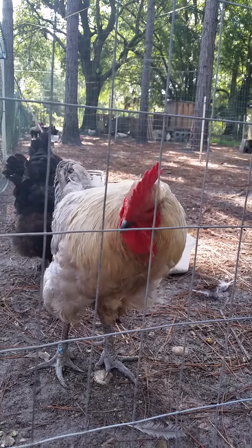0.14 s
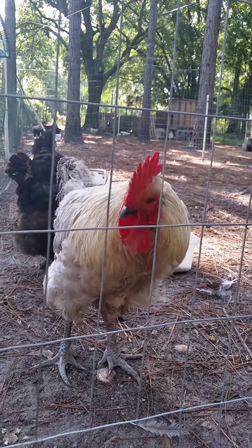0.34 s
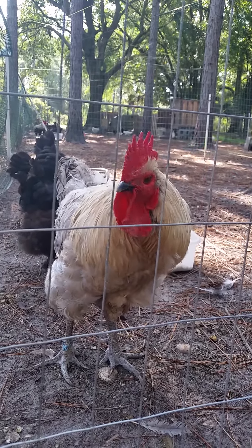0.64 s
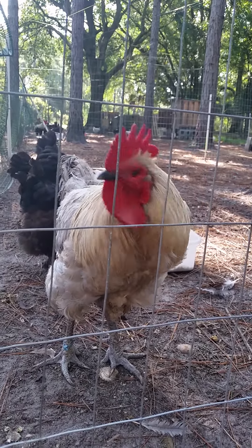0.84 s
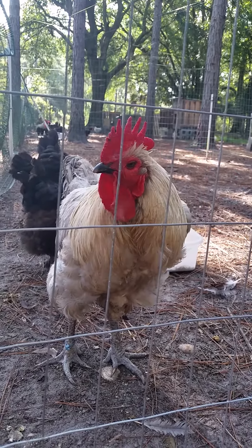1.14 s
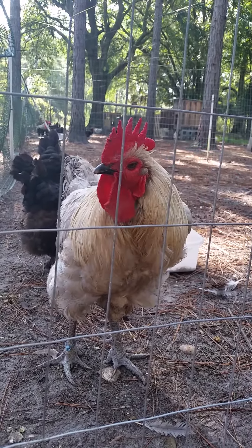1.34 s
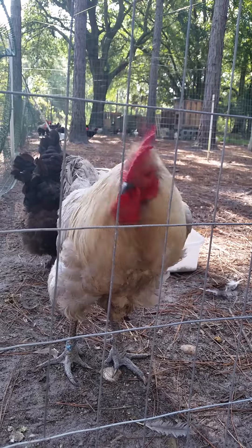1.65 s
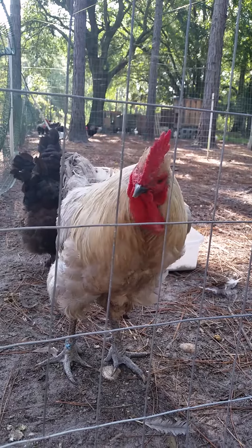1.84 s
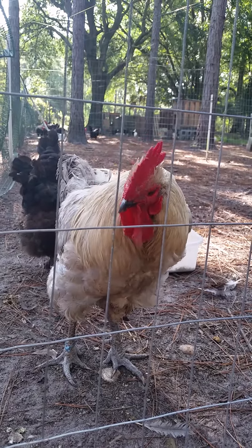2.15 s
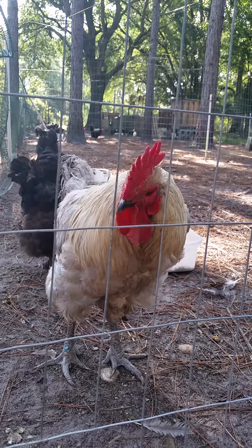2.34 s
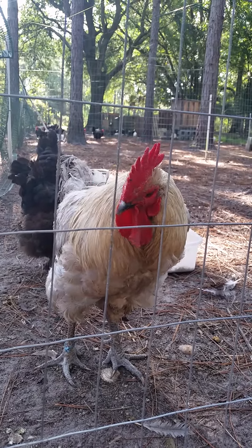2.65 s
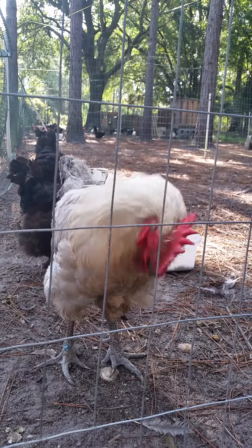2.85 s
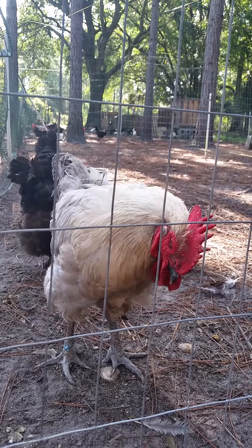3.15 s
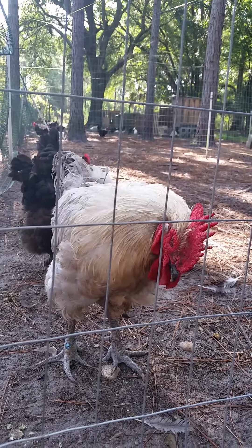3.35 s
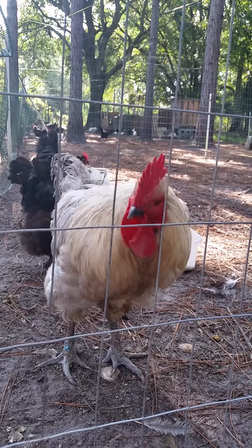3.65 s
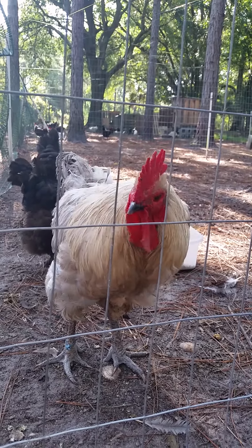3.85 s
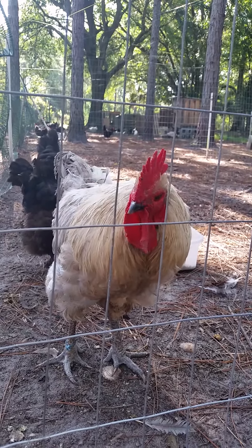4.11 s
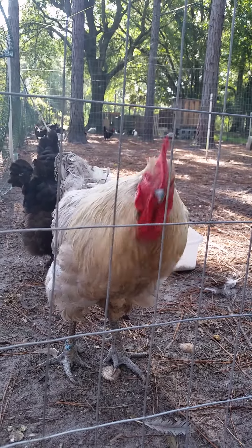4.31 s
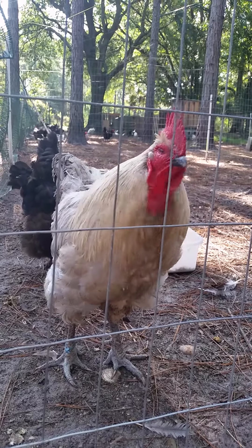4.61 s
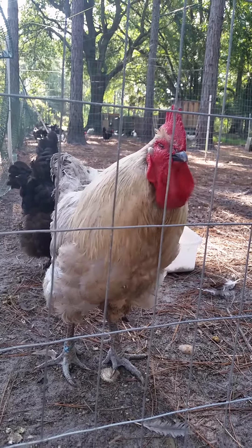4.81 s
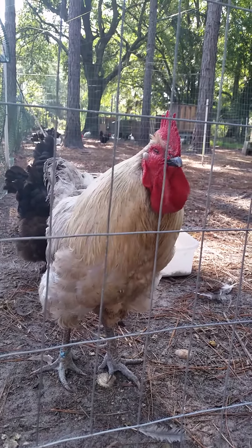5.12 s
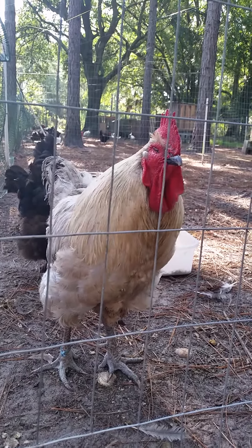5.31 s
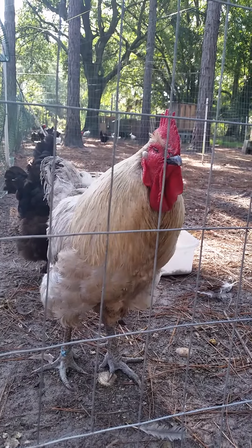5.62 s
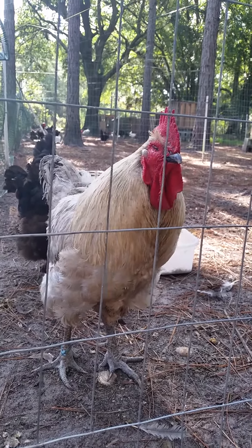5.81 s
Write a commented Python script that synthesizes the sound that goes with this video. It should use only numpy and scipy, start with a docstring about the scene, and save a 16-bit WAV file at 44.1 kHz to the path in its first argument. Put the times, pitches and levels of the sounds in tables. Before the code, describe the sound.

In a wooded chicken run, far-off crows overlap amid faint scuffs before a nearby rooster bursts into a ringing, sagging call.

```python
"""Roosters in a wooded run

Two roosters crow some way off, one clear and one hoarse; a third crows close by, with a short two-voiced
syllable and a long note that sags in pitch. The voices are stacked harmonics coloured by throat curves, plus
pure tones and breath noise. Soft bumps and scuffs are struck resonances and shaped noise.
Filtered noise makes the insect hiss, the pulsed chirps and the low rumble under everything."""
import sys
import numpy as np
from scipy import signal
from scipy.fft import rfft, irfft, next_fast_len
from scipy.io import wavfile
from scipy.ndimage import uniform_filter1d, map_coordinates

SR = 44100
rng = np.random.default_rng(int(sys.argv[2]) if len(sys.argv) > 2 else 0)


def inscribe(sig):
    """Save sig as 16-bit PCM at rate SR to the path in sys.argv[1].

    A 1-D sig is mono; a 2-D sig holds one channel per row.
    Samples are clipped to [-1, 1] before scaling.
    """
    pcm = np.round(np.clip(np.atleast_2d(sig).T, -1, 1) * 32767)
    wavfile.write(sys.argv[1], SR, pcm.astype(np.int16))


N = 263277
TIME = np.arange(N) / SR
CUTOFF_HZ = 14650

# Near rooster's opening syllable with the scoop upwards, then its long note: (time [s], pitch [Hz])
OPENING_PITCH = [(4.5, 566), (4.535, 601), (4.555, 690), (4.6, 774.7), (4.65, 754), (4.72, 760),
                 (4.75, 574), (4.778, 669)]
LONG_PITCH = [(4.785, 806), (4.831, 826.4), (4.889, 797.2), (4.981, 808.4), (5.051, 819), (5.231, 808.3),
              (5.293, 798.6), (5.415, 697), (5.471, 745.5), (5.639, 755), (5.803, 753), (5.965, 737.4)]
# How hard it pushes in each: (time [s], effort [dB])
OPENING_EFFORT = [(4.5, -59), (4.525, -32.5), (4.565, -32), (4.61, -20), (4.645, -29.5), (4.685, -38.5),
                  (4.735, -49)]
LONG_EFFORT = [(4.755, -30.5), (4.791, -17.5), (4.87, -17.5), (5.13, -18), (5.28, -19.5), (5.42, -26),
               (5.65, -26), (5.78, -27.5), (5.965, -28.5)]
FULL_EFFORT_DB = -17.5
# Its harmonics 1 to 5, then the overtones:
# (level at full effort [dB], change per dB of effort [dB], gain with beak wide open [dB])
NEAR_PARTIALS = [(-35.5, 0.48, 1.5), (-22.5, 0.9, 2), (-19, 1.15, -8.5), (-26, 1.2, -5), (-37.5, 1.45, 16),
                 (-33, 1.31, 4.5)]
# Its beak opens wide: (start [s], end [s], opening [0-1])
NEAR_GAPES = [(4.995, 5.345, 0.92), (5.51, 5.99, 0.54)]
# Its voice breaks up: (start [s], end [s], added roughness [0-1], period doubling [0-1])
NEAR_BREAKS = [(4.48, 4.58, 0.2, 0.1), (4.625, 4.74, 0.62, 0.61), (4.73, 4.80, .3, 0),
               (4.875, 5.19, 0, .075), (5.36, 5.47, 0.03, 0), (5.47, 5.55, 0.17, 0), (5.56, 5.95, 0, .06)]
STEADY_ROUGHNESS = 0.0074
# Its throat resonances: (frequency [Hz], gain [dB])
NEAR_THROAT = [(560, 7.5), (670, 12), (750, 0.5), (1600, 1), (2250, 0.5), (2405, 0.5), (2475, -4),
               (2800, -11), (3020, -1.5), (3200, -6), (3290, 0), (3400, 0), (4100, -7), (4900, -10),
               (5600, -30.5), (6000, -11), (6500, -16), (7300, -4.5), (8200, -6.5), (9200, -17.5),
               (10500, -26.5), (12300, -31), (14000, -46)]
# Colour of the air hissing through its throat: (frequency [Hz], gain [dB])
NEAR_AIR = [(150, -23), (370, 8), (700, 2), (1100, -11), (2000, 1), (3600, -8), (4700, -1.5), (5800, -17),
            (7400, 7), (8600, -1.5), (11000, -19), (14000, -38)]
AIR_FULL_EFFORT_DB, AIR_DB_PER_EFFORT_DB = -45, 0.14
# The strained middle of the long note trembles
TREMOR_START_S, TREMOR_END_S, TREMOR_EDGE_S, TREMOR_HZ = 4.998, 5.32, .045, 33.5
# Low second voice of its syrinx: (time [s], level [dB])
HOOT_LEVEL = [(4.485, -47), (4.507, -23), (4.55, -34.5), (4.62, -32), (4.678, -20.5), (4.715, -32)]
# The hoot arches once in pitch
HOOT_TOP_S, HOOT_TOP_HZ, HOOT_TURN_S = 4.568, 404.3, .033
HOOT_RISE_HZ_PER_S, HOOT_FALL_HZ_PER_S = 2200, 970

# Hoarse rooster's crow: (time [s], pitch [Hz])
HOARSE_PITCH = [(1.3, 637), (1.36, 779.4), (1.65, 802.2), (2.3, 746), (2.6, 746.4), (2.76, 703)]
# Its syllables, with levels before slackening and final gains: (start [s], end [s], rise [s], fall [s],
# growl pitch [Hz], growl level [dB], crow effort [dB], rasp level [dB], growl roughness [0-1])
HOARSE_SYLLABLES = [(1.3, 1.472, 0.0399, 0.0973, 780, -37.5, -1.5, -51.5, 0.21),
                    (1.47, 1.97, .12, 0.15, 760, -37, 0.5, -41, 0.73),
                    (1.968, 2.782, 0.0684, 0.132, 697, -36.5, -2, -46.5, 0.49)]
# As its push slackens, the growl moves to a resting pitch and each layer loses level
GROWL_REST_HZ, GROWL_SLACK_DB, CROW_SLACK_DB, RASP_SLACK_DB = 600, 10.5, 7.5, 7
GROWL_SAG_HZ_PER_S, RASP_FADE_DB_PER_S = 60, 8.5
# Its harmonics 1-2, harmonic 3, then the overtones, before the crow's gain:
# (level at 0 dB effort [dB], change per dB of effort [dB], gain with beak wide open [dB])
HOARSE_PARTIALS = [(-36, 3, 3), (-23.5, .5, -27), (-40.5, 1.5, 0.5)]
# Its beak opens once during the call and scales the throat resonances from shut upwards
HOARSE_GAPE_S, HOARSE_GAPE_RISE_S, BEAK_SHUT_SCALE, BEAK_LIFT = 2.03, 0.24, 0.948, 0.096
# Its throat resonances: (frequency [Hz], gain [dB])
HOARSE_THROAT = [(780, -1.5), (1400, 2.5), (2400, -23.5), (3300, -3.5), (3800, -31), (5100, -4),
                 (6150, -17.5), (6900, -9), (8500, -8.5), (10200, -26), (14000, -28)]
# Colour of its rasping air: (frequency [Hz], gain [dB])
RASP_COLOUR = [(330, -0.5), (700, -15.5), (1200, -2), (1700, 5.5), (2150, 12.5), (2550, -17), (3200, -1.5),
               (3800, -16), (4400, -6), (5100, -6), (5900, -35), (14000, -34)]

# Clear rooster's crow: (time [s], pitch [Hz])
CLEAR_PITCH = [(.97, 491), (1.05, 519.6), (1.2, 538.5), (1.3, 526.7), (2.76, 567.3), (2.9, 552),
               (3.05, 538.4), (3.15, 512.2), (3.3, 469)]
# Its notes: (start [s], end [s], effort at the start [dB])
CLEAR_NOTES = [(.975, 1.3, -4), (2.68, 3.3, 0.5)]
CLEAR_ATTACK_S, CLEAR_RELEASE_S, EFFORT_FADE_DB_PER_S = 0.035, .08, 14.5
CLEAR_GAPE_S, CLEAR_GAPE_RISE_S = 2.966, 0.14   # its beak opens for the final slide
# Its harmonics 1, 2, 3-4, then the overtones, before the crow's gain:
# (level at 0 dB effort [dB], change per dB of effort [dB], gain with beak wide open [dB])
CLEAR_PARTIALS = [(-34, 3.5, 4.5), (-41.5, 2, 7.5), (-44.5, 0.35, 8.5), (-48.5, 1.5, 8.5)]
# Its throat resonances: (frequency [Hz], gain [dB])
CLEAR_THROAT = [(550, -5), (1100, -5.5), (2100, -10.5), (2700, -22.5), (3800, -19), (4800, -29), (5500, -5),
                (6300, -20), (8600, -6), (10000, -32), (14000, -28)]

# Stereo colour of the calls: (frequency [Hz], left minus right [dB])
STEREO_BALANCE = [(400, 1), (780, -3.5), (1600, -1.5), (2350, 2.5), (3200, -6), (4100, -1), (5200, -9.5),
                  (7400, -1), (8400, -6.5), (10000, 2), (12500, 12)]

# Dull bumps, before their shared gain: (time [s], strike level [dB], ring [Hz])
BUMPS = [(0.592, -40.5, 620), (0.603, -46, 430), (0.68, -32.5, 600), (0.695, -31.5, 546), (1.298, -35, 620),
         (2.724, -32, 455), (2.743, -34, 522.6), (3.035, -37.5, 476), (3.211, -34, 300), (3.654, -42, 284),
         (4.196, -36.5, 257), (4.349, -48, 406), (4.844, -26, 594), (5.092, -28.5, 304), (5.149, -33, 545)]
# Scratchy ticks in the litter, before their shared gain: (time [s], strike level [dB])
TICKS = [(0.797, -25), (0.818, -22.5), (0.848, -30), (0.883, -30), (0.901, -28), (1.301, -21.5),
         (4.17, -32.5)]
# Resonances of a tick: (frequency [Hz], width [Hz], level [dB])
TICK_BODY = [(583, 89, 15), (1170, 190, 0), (2040, 1600, -20), (4560, 4300, 6)]
# Shuffling on dry ground, before the layer trims: (time [s], low level [dB], rustle level [dB])
SHUFFLE = [(3.4, -88, -61.5), (3.938, -55.5, -70.5), (4.47, -64, -66.5)]
# Colours of its low part and of its rustle: (frequency [Hz], gain [dB])
SHUFFLE_COLOUR = [(130, -6), (220, 16.5), (330, 2.5), (800, -28), (1500, -47.5)]
RUSTLE_COLOUR = [(250, -25), (600, 8), (2100, 13), (3000, 2), (12000, -16)]

# A high insect's chirps: (time [s])
CHIRPS = [.04, .55, .715, .9, 1.07, 1.24, 1.42]
# Colours of the chirp, the insect chorus and the rumble: (frequency [Hz], gain [dB])
CHIRP_COLOUR = [(4500, -42), (7000, -3), (10000, -2), (11500, -3.5), (13000, -27)]
INSECTS = [(3000, -26), (5800, -28), (6900, -6), (8700, -9.5), (9800, -22.5), (14500, -16)]
RUMBLE = [(12, -39), (20, -10), (141, -2.5), (181, -11), (209, -11), (474, -26.5), (1530, -43), (3000, -45),
          (3900, -117), (6600, -120)]
# How alike left and right are in the noise layers: (frequency [Hz], likeness [0-1])
LIKENESS = [(25, 0.16), (70, 1), (250, 0.6), (12000, 0.054)]


def near_rooster():
    """A loud ringing crow with a little air; the other side of the syrinx hoots under the opening syllable."""
    pitch, = in_time(np.vstack([OPENING_PITCH, LONG_PITCH]))
    effort = np.vstack([OPENING_EFFORT, LONG_EFFORT])
    effort_db = in_time(effort)[0] - FULL_EFFORT_DB
    gate = sounding(effort)
    gape, = spells(NEAR_GAPES, edge_s=0.038)
    rough, doubling = spells(NEAR_BREAKS, edge_s=0.014)

    strain = plateau(TREMOR_START_S, TREMOR_END_S, TREMOR_EDGE_S, 2 * TREMOR_EDGE_S)
    tremor = strain * np.sin(2 * np.pi * TREMOR_HZ * (TIME - TREMOR_START_S))
    pitch = pitch * (1 + 0.006 * tremor)
    levels = partials(NEAR_PARTIALS, effort_db, gape)
    crow = syrinx(pitch, levels, gate, NEAR_THROAT, order=(0, 1, 2, 3, 4, 5),
                  rough=STEADY_ROUGHNESS + rough, doubling=doubling,
                  jitter=0.0023, flutter_hz=227, shimmer_db=2.4)

    hiss = rms_one(tinted(rng.standard_normal(N), NEAR_AIR))
    hiss = hiss * from_db(AIR_FULL_EFFORT_DB + AIR_DB_PER_EFFORT_DB * effort_db) * gate
    call = from_db(0.26 + 2.0 * tremor) * crow + hiss + hoot()
    return among_trees(call, lead_ms=.083, wet_db=-19, t60=.4)


def hoot():
    """A low, nearly pure tone from the second side of the syrinx that rises quickly, turns over and sinks."""
    from_top = TIME - HOOT_TOP_S
    slope = np.where(from_top < 0, HOOT_RISE_HZ_PER_S, HOOT_FALL_HZ_PER_S)
    # the hyperbola rounds off the top of the arch
    pitch = HOOT_TOP_HZ - slope * (np.hypot(from_top, HOOT_TURN_S) - HOOT_TURN_S)
    tone = second_voice(pitch, in_time(HOOT_LEVEL)[0], rough=0.024, flutter_hz=40)
    return tone * sounding(HOOT_LEVEL)


def hoarse_rooster():
    """Three pushes of ragged cycles over a growl, with air rasping through in puffs at the crow's pitch."""
    start, end, rise_s, fall_s, *targets = current(HOARSE_SYLLABLES)
    # glide between syllable settings over 1500 samples
    targets = uniform_filter1d(np.array(targets), size=1500, axis=1)
    top_hz, growl_db, crow_db, rasp_db, growl_rough = targets
    push = plateau(start, end, rise_s, fall_s)
    slack = 1 - push
    age = np.maximum(TIME - start, 0)
    gate = plateau(HOARSE_SYLLABLES[0][0], HOARSE_SYLLABLES[-1][1], .007, 0.041)
    gape = ramp(HOARSE_GAPE_S, HOARSE_GAPE_RISE_S)

    pitch, = in_time(HOARSE_PITCH)
    levels = partials(HOARSE_PARTIALS, crow_db - CROW_SLACK_DB * slack, gape)
    crow = syrinx(pitch, levels, gate, HOARSE_THROAT, order=(0, 0, 1, 2), rough=.42, doubling=0.06,
                  jitter=0.02, flutter_hz=121, shimmer_db=1.5, beak=BEAK_SHUT_SCALE + BEAK_LIFT * gape)

    above_rest_hz = top_hz - GROWL_SAG_HZ_PER_S * age - GROWL_REST_HZ
    growl_pitch = GROWL_REST_HZ + above_rest_hz * np.sin(np.pi / 2 * push)
    growl = second_voice(growl_pitch, growl_db - GROWL_SLACK_DB * slack, growl_rough, flutter_hz=63.0)

    puffs = 1 + np.sin(2 * np.pi * np.cumsum(pitch) / SR)
    rasp_db = rasp_db - RASP_SLACK_DB * slack - RASP_FADE_DB_PER_S * age
    rasp = rms_one(tinted(rng.standard_normal(N) * puffs, RASP_COLOUR))
    rasp = rasp * from_db(rasp_db + 4.5 + 2.6 * drift(72))
    call = from_db(-5.5) * crow + (growl + rasp) * gate
    return among_trees(call, lead_ms=0.096, wet_db=-2.5, t60=0.39)


def clear_rooster():
    """A lower, thinner harmonic crow in two notes; the beak opens and brightens the last slide downwards."""
    pitch, = in_time(CLEAR_PITCH)
    start, end, effort_db = current(CLEAR_NOTES)
    effort_db = effort_db - EFFORT_FADE_DB_PER_S * (TIME - start)
    levels = partials(CLEAR_PARTIALS, effort_db, ramp(CLEAR_GAPE_S, CLEAR_GAPE_RISE_S))
    gate = plateau(start, end, CLEAR_ATTACK_S, CLEAR_RELEASE_S)
    crow = syrinx(pitch, levels, gate, CLEAR_THROAT, order=(0, 1, 2, 2, 3), rough=0.29, doubling=0.029,
                  jitter=0.00606, flutter_hz=140, shimmer_db=1.0)
    return among_trees(from_db(-4.0) * crow, lead_ms=0.092, wet_db=1.0, t60=0.56)


def ground():
    """Bumps and ticks as gritty clicks into damped resonances, plus shuffling as noise of wavering level."""
    bumps = 0
    for s, db, hz in BUMPS:
        force = contacts([(s, db)], crumble=0.064, crumble_s=0.016)
        bumps = bumps + struck(force, [(hz, 130, 0), (0.69 * hz, 120, -2)])
    bumps = signal.sosfilt(signal.butter(2, 1100, fs=SR, output="sos"), bumps)
    ticks = struck(contacts(TICKS, crumble=0.084, crumble_s=0.019), TICK_BODY)
    ticks = signal.sosfilt(signal.butter(1, 4000, fs=SR, output="sos"), ticks)

    low_db, rustle_db = in_time(SHUFFLE)
    shuffle = from_db(low_db - 1.5 + 8.3 * drift(29)) * air(SHUFFLE_COLOUR)
    rustle = from_db(rustle_db - 7.5 + 1.46 * drift(35)) * air(RUSTLE_COLOUR)
    return from_db(5.5) * bumps + from_db(-8.5) * ticks + (shuffle + rustle) * sounding(SHUFFLE)


def background():
    """Steady noise for the rumble and insect chorus, and pulsed noise for one insect chirping above it."""
    rumble = from_db(-48.5) * air(RUMBLE)
    chorus = from_db(-67.0) * air(INSECTS)
    chirps = from_db(-59.5) * sum(plateau(s - .045, s + 0.055, 0.022, 0.02) for s in CHIRPS)
    # quick, uneven wing strokes, about 76 a second
    strokes = 2 * np.sin(np.pi * 76 * TIME + 0.64 * drift(12.5)) ** 10
    lean_right = from_db([[-1], [1]])
    return (rumble + chorus) * lean_right + chirps * strokes * air(CHIRP_COLOUR)


def syrinx(pitch, columns, gate, throat, order, rough, doubling, jitter, flutter_hz, shimmer_db, beak=1):
    """Harmonics through a throat curve; roughness shakes cycle timing and strength, doubling alternates them.

    order gives the level column of each harmonic, the last serving all higher ones."""
    phase = 2 * np.pi * np.cumsum(pitch * (1 + jitter * drift(57.6))) / SR
    shake = .5 * rough * drift(flutter_hz) + 0.47 * doubling * np.sin(phase / 2)
    swell = gate * (1 + rough * drift(flutter_hz) + doubling * np.cos(phase / 2))
    throat_hz = pitch / beak   # a larger beak scale lifts every resonance
    on = gate > 0
    out = np.zeros(N)
    waver = drift(35.0)
    for k in range(1, int(CUTOFF_HZ / np.median(pitch[on])) + 2):
        db = columns[order[min(k, len(order)) - 1]][on] + at_hz(throat, k * throat_hz[on])
        shimmer = shimmer_db * (.5 if k == 2 else 1)   # the second partial is the steadiest
        db = db + shimmer * np.roll(waver, rng.integers(N))[on]
        angle = k * phase[on] + min(k, 4.5) * shake[on] + rng.uniform(0, 2 * np.pi)
        out[on] += np.sqrt(2) * from_db(db) * np.sin(angle)
    return out * swell / np.sqrt(1 + rough ** 2)


def second_voice(pitch, level_db, rough, flutter_hz):
    """A near-pure tone, torn by random flutter in strength and phase as it gets rough."""
    phase = 2 * np.pi * np.cumsum(pitch) / SR
    torn = drift(flutter_hz) * np.sin(phase) + drift(flutter_hz) * np.cos(phase)
    tone = np.sin(phase) * (1 - rough) + rough * torn
    return tone / np.sqrt((1 - rough) ** 2 / 2 + rough ** 2) * from_db(level_db)


def partials(table, effort_db, gape):
    """Level of each group of harmonics, set by effort and by how far the beak is open."""
    return [db + follows * effort_db + gape_db * gape for db, follows, gape_db in table]


def among_trees(x, lead_ms, wet_db, t60):
    """Direct sound arrives on the left first; trunks scatter a dull decaying tail."""
    delayed = map_coordinates(x, [np.arange(N) - lead_ms * SR / 1000], order=3)
    direct = np.array([x, delayed])
    age = np.arange(SR) / SR
    scatter = rng.standard_normal((2, SR)) * from_db(-60 * age / t60) * (age > .012)
    scatter = scatter / np.sqrt(np.sum(scatter[0] ** 2))
    scatter = signal.sosfilt(signal.butter(1, 3500, fs=SR, output="sos"), scatter)
    both = direct + from_db(wet_db) * signal.fftconvolve(x[None], scatter, axes=1)[:, :N]
    left = tinted(both[0], [(hz, db / 2) for hz, db in STEREO_BALANCE])
    right = tinted(both[1], [(hz, -db / 2) for hz, db in STEREO_BALANCE])
    return np.array([left, right])


def struck(force, body):
    """Damped resonances in parallel, scaled so that a unit click peaks at 1."""
    def respond(x):
        out = 0
        for hz, width, db in body:
            r = np.exp(-np.pi * width / SR)
            w = 2 * np.pi * hz / SR
            ring = signal.lfilter([1, -r * np.cos(w)], [1, -2 * r * np.cos(w), r * r], x + 1e-18)
            out = out + from_db(db) * ring
        return out
    return respond(force) / np.abs(respond(signal.unit_impulse(SR // 10))).max()


def contacts(rows, crumble, crumble_s):
    """Each contact is a click with a short crumbling of grit."""
    force = np.zeros(N + SR)
    age = np.arange(SR // 10) / SR
    for s, db in rows:
        grit = crumble * rng.standard_normal(len(age)) * np.exp(-age / crumble_s)
        force[round(s * SR) + np.arange(len(age))] += from_db(db) * (grit + (age == 0))
    return force[:N]


def air(spectrum):
    """Coloured stereo noise whose left-right likeness varies with frequency; rms 1."""
    mid, side = rng.standard_normal((2, N))
    side_db = []
    for hz, likeness in LIKENESS:
        c = np.clip(likeness, 0, .99)
        side_db.append((hz, 10 * np.log10((1 - c) / (1 + c))))
    return rms_one(tinted(mid + tinted(side, side_db) * [[1], [-1]], spectrum))


def drift(rate_hz):
    """Random wavering up to about a given rate; rms 1."""
    low_pass = signal.butter(2, rate_hz, fs=SR, output="sos")
    slow = signal.sosfilt(low_pass, rng.standard_normal(N + SR))
    return rms_one(slow[SR:])   # drop the filter's first second


def tinted(x, spectrum):
    """Sound passed through a smooth spectrum."""
    size = next_fast_len(N)
    hz = np.arange(size // 2 + 1) * SR / size
    return irfft(rfft(x, size) * from_db(at_hz(spectrum, hz)), size)[..., :N]


def at_hz(points, hz):
    """A spectrum read on a log-frequency axis."""
    points = np.array(points)
    return np.interp(np.log(hz + 1e-9), np.log(points[:, 0]), points[:, 1])


def in_time(rows):
    """Each column of a curve, sample by sample."""
    s, *columns = np.transpose(rows)
    return [np.interp(TIME, s, c) for c in columns]


def sounding(rows, fade_s=0.0077):
    """One while a curve lasts, with a short fade just outside each end."""
    inside_s = np.minimum(TIME - rows[0][0], rows[-1][0] - TIME)
    return np.clip(inside_s / fade_s + 1, 0, 1)


def ramp(start, rise_s):
    """Goes from 0 to 1 and stays there."""
    return np.clip((TIME - start) / rise_s, 0, 1)


def plateau(start, end, rise_s, fall_s):
    """Attack, hold at 1, release."""
    return np.minimum(ramp(start, rise_s), 1 - ramp(end - fall_s, fall_s))


def spells(rows, edge_s):
    """Each column holds from a row's start to its end, with soft edges; overlapping rows add."""
    return sum(np.outer(values, plateau(start, end, edge_s, edge_s)) for start, end, *values in rows)


def current(rows):
    """The columns of the latest event to have started (the first one before that), sample by sample."""
    rows = np.array(rows)
    return rows[np.maximum(np.searchsorted(rows[:, 0], TIME) - 1, 0)].T


def from_db(db):
    """Decibels to amplitude."""
    return 10 ** (np.asarray(db) / 20)


def rms_one(x):
    """Sound scaled to an rms of 1."""
    return x / np.sqrt(np.mean(x ** 2) + 1e-20)


def scene():
    """All three roosters, the ground noises and the background together."""
    return near_rooster() + hoarse_rooster() + clear_rooster() + ground() + background()


def record(dry):
    """A steep low-pass removes the extreme treble."""
    return signal.sosfilt(signal.ellip(10, .1, 80, CUTOFF_HZ, fs=SR, output="sos"), dry)


dry = scene()
out = record(dry)
inscribe(out)
```